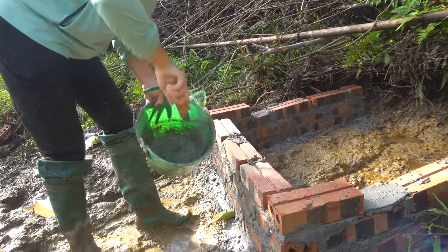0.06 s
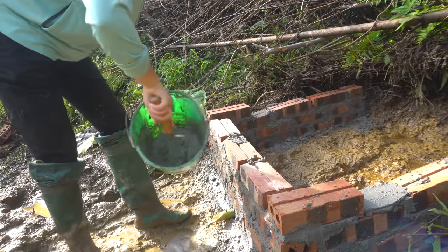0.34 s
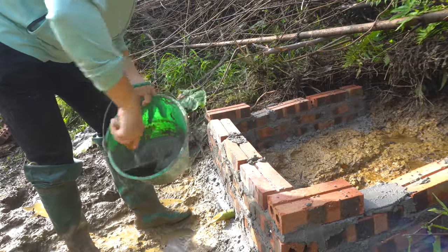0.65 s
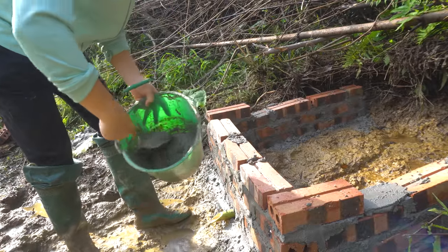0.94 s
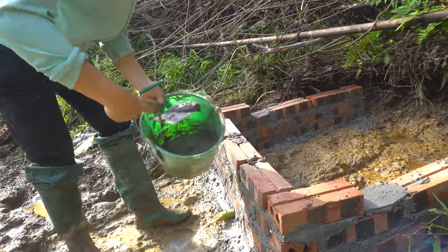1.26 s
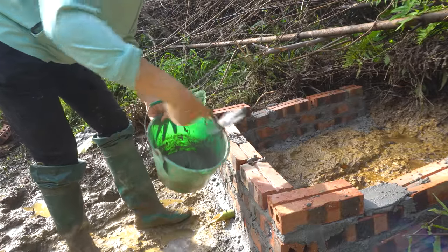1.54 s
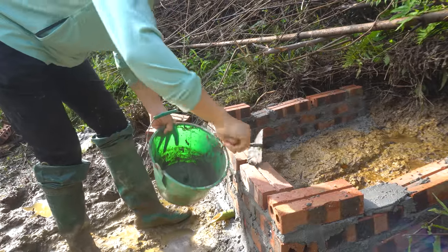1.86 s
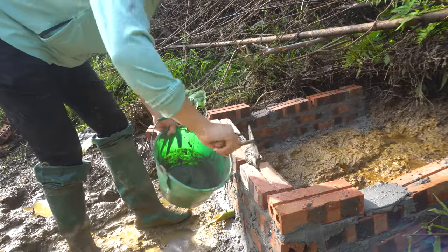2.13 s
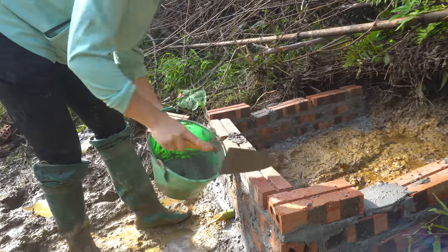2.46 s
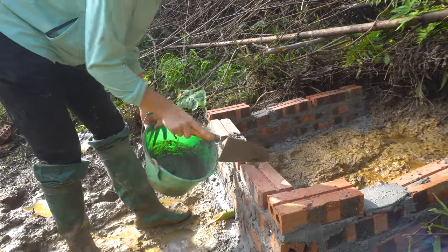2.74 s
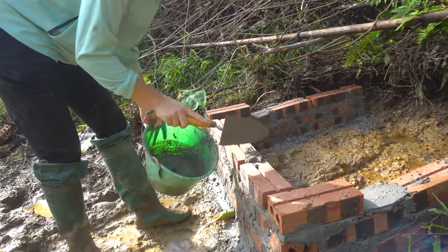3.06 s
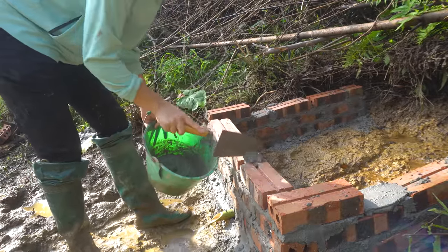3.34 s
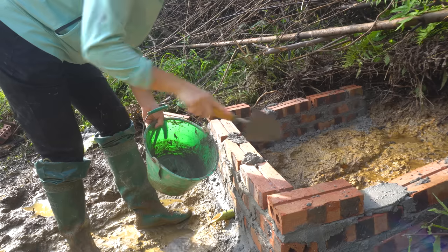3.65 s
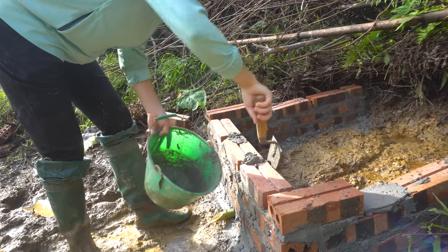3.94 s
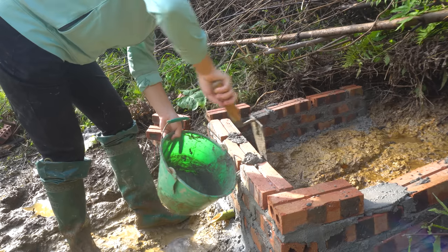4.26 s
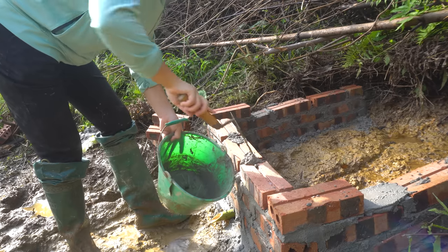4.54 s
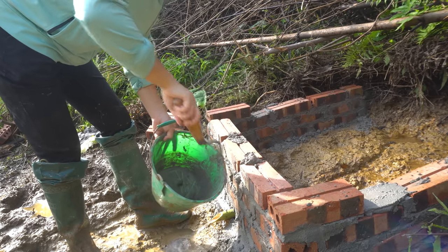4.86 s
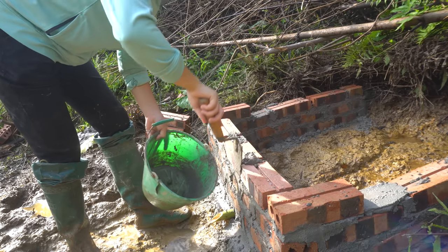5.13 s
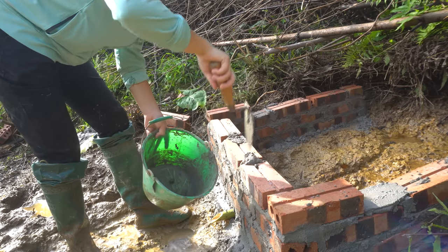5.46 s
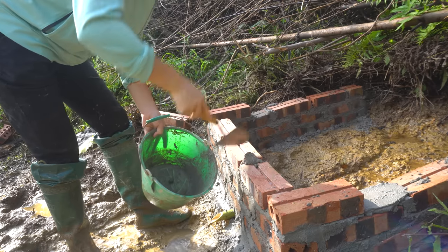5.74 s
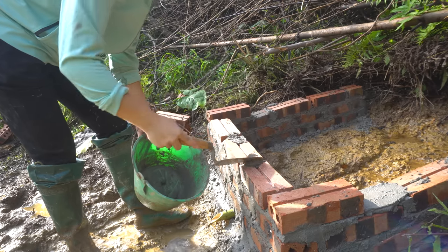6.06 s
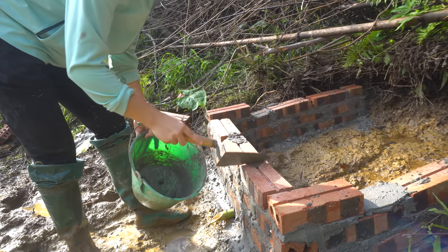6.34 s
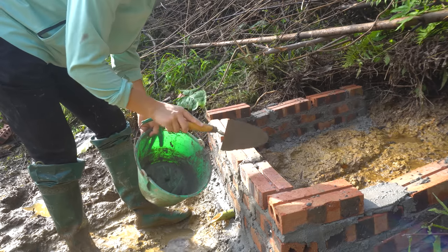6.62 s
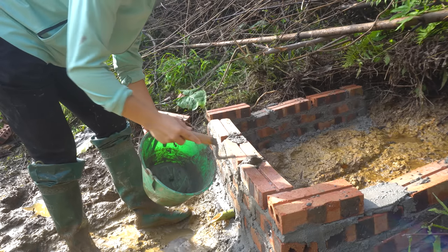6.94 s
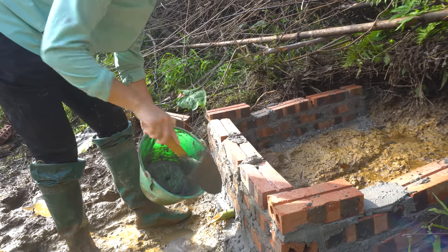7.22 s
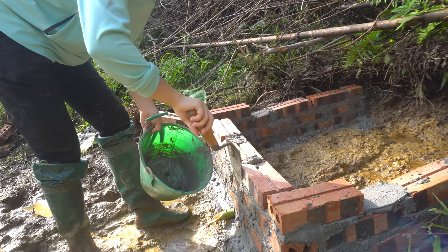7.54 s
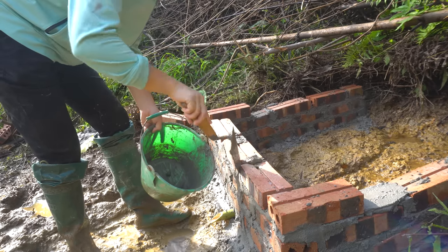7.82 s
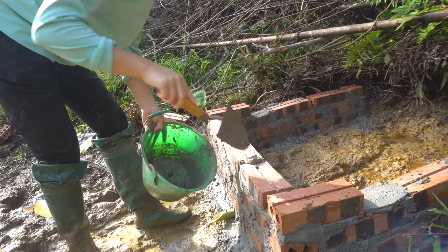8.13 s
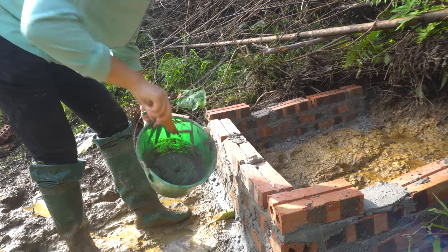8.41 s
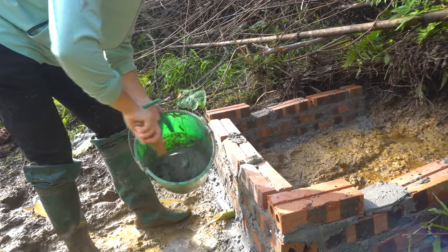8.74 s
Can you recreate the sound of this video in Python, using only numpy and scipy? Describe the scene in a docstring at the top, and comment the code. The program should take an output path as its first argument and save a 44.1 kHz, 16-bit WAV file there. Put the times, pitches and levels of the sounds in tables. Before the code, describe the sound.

A steel trowel scoops wet mortar from a plastic bucket and scrapes bricks, over trickling water and trilling insects.

```python
"""Bricklaying outdoors

A steel trowel scoops wet mortar from a plastic bucket, then taps and scrapes it along a brick wall:
the blade sticks and slips, crushes sand and rings when struck. Close by, water trickles as ringing
bubbles and crickets shrill. Two insects trill in swelling phrases, one near, one fainter and higher.
Behind them lie a far insect chorus, a low rumble and the hum of a distant engine."""
import sys
import numpy as np
from scipy import signal
from scipy.fft import rfft, irfft
from scipy.io import wavfile

SR = 44100
rng = np.random.default_rng(int(sys.argv[2]) if len(sys.argv) > 2 else 0)


def digitize_waveform(pressure):
    """Quantize a signal to 16-bit integers and store it at the path in sys.argv[1].

    Rows of a 2-D input are taken as channels; values are limited to [-1, 1].
    """
    field = np.atleast_2d(pressure).T
    bounded = np.clip(field, -1, 1)
    quanta = np.round(bounded * 32767).astype(np.int16)
    wavfile.write(sys.argv[1], SR, quanta)


N = 387198
TIME, FREQS = np.arange(N) / SR, np.fft.rfftfreq(N, 1 / SR)
BAND_LIMIT_HZ = 15850


def amp(db):
    """Decibels to gain."""
    return 10 ** (np.asarray(db) / 20)


def unit(x):
    """Scale to rms 1."""
    return x / np.sqrt(np.mean(x ** 2) + 1e-20)


def lookup(points, hz):
    """Interpolate a table over log frequency."""
    f, value = np.transpose(points)
    return np.interp(np.log(hz + 1), np.log(f + 1), value)


def add(mix, start_s, sound):
    """Mix a sound in at start_s."""
    part = mix[:, max(round(start_s * SR), 0):][:, :sound.shape[-1]]
    part += sound[..., :part.shape[1]]


def wander(hz):
    """Random drift of rms 1, bandwidth about hz."""
    knots = rng.standard_normal(N // 4)
    return unit(np.interp(TIME * 2 * hz, np.arange(len(knots)), knots))


def noise_pair(coherence):
    """Stereo white noise with the given left-right coherence."""
    common, separate = rfft(rng.standard_normal((2, N)))
    same = np.clip(lookup(coherence, FREQS), 0, 1)
    return irfft(np.array([common, same * common + np.sqrt(1 - same ** 2) * separate]), N)


def ring(hz, t60_s, rise=0., attack_s=0.0013):
    """Damped sine; pitch climbs by the fraction rise per t60."""
    t = np.arange(0, t60_s * 2, 1 / SR)
    envelope = amp(-60 * t / t60_s) * (1 - np.exp(-t / attack_s))
    return envelope * np.sin(2 * np.pi * hz * t * (1 + rise * t / t60_s / 2))


# background rumble and hiss, with narrow dips either side of 3.2 kHz: f/Hz, level/dB
BACKGROUND_SPECTRUM = [(20, -17), (45, -4), (75, 5.5), (125, 2.5), (200, -2.5), (450, -8.5), (750, -3.5),
                       (1100, -8.5), (2400, -8.5), (2830, -11), (3200, -0.5), (3750, -11), (4300, -9),
                       (6500, -12.5), (10000, -9), (13000, -17.5), (16000, -13.5)]
# far sound, left to right: f/Hz, coherence/0-1
FAR_COHERENCE = [(100, 0.94), (300, 0.2), (1000, 0), (4000, 0.37), (15000, 0)]
def ambience(level_db=-52, flutter_db=2.5, crossover_hz=450):
    """Steady rumble under the fluttering wash of the water."""
    spectrum = rfft(noise_pair(FAR_COHERENCE)) * amp(lookup(BACKGROUND_SPECTRUM, FREQS))
    low_share = 1 / (1 + (FREQS / crossover_hz) ** 4)
    rumble = irfft(spectrum * low_share, N)
    wash = irfft(spectrum * (1 - low_share), N) * amp(flutter_db * wander(30))
    return amp(level_db) * unit(rumble + wash)


# engine firing rate: t/s, f/Hz
FIRING_RATE = [(1.1, 89.4), (4.53, 89.7), (4.82, 96.8), (5.15, 96.6), (5.51, 91), (6.07, 95), (6.26, 87.3),
               (8.18, 90.0), (8.6, 97.3)]
def engine(idle_hz=88.6, idle_db=-59, load_db_per_hz=0.42, waver_db=1.9, drift_hz=0.5):
    """Far firing note, louder with speed, wavering on its way through the air."""
    hz = np.interp(TIME, *np.transpose(FIRING_RATE)) + drift_hz * wander(2.3)
    level = amp(idle_db + load_db_per_hz * (hz - idle_hz) + waver_db * wander(4.5))
    return level * unit(np.sin(2 * np.pi * np.cumsum(hz) / SR))


def chorus(hz, width_hz, level_db, flutter_db):
    """Many far insects merge into a fluttering band of hiss."""
    band = irfft(rfft(noise_pair(FAR_COHERENCE)) * np.exp(-2 * ((FREQS - hz) / width_hz) ** 2), N)
    return amp(level_db) * unit(band * amp(flutter_db * wander(63) + 0.16 * wander(13)))


# one cricket a row: f/Hz, pulse rate/Hz, chirp rate/Hz, level/dB
CRICKET_VOICES = [(4995, 62, 20.7, -56.5), (4910, 240, 9, -57.5), (4460, 52, 5.3, -61),
                  (4710, 110, 3.7, -68)]
def crickets(fall=0.051, waver=.012):
    """Each cricket sings quick falling pulses, grouped into chirps, from its own direction."""
    out = np.zeros((2, N))
    for hz, pulse_hz, chirp_hz, db in CRICKET_VOICES:
        clock_s = np.cumsum(1 + .04 * wander(3)) / SR
        stroke = clock_s * pulse_hz % 1
        envelope = np.sin(np.pi * stroke) * (1 + 0.8 * np.sin(2 * np.pi * chirp_hz * clock_s))
        cycles = np.cumsum(hz * (1 - fall * (stroke - .5) + waver * wander(153))) / SR
        ear_offset = rng.uniform(0, 0.4, (2, 1))
        out += amp(db) * unit(envelope * np.sin(2 * np.pi * (cycles + ear_offset)))
    return out


# two insects, one near, one fainter and higher: start/s, climax/s, end/s, gain/dB, pitch shift/Hz
TRILL_PHRASES = [(1.02, 1.66, 2.08, -1, 0), (2.42, 2.62, 2.72, -12, 220), (2.83, 3.56, 4.2, -1, 0),
                 (4.98, 5.63, 6.5, -2, 0), (6.05, 6.25, 6.37, -9, 230), (7.02, 7.58, 8.62, -2, 0),
                 (8.3, 8.53, 8.64, -7, 230)]
def trills(base_db=-48, swell_db=6.5, unsteady_db=2.5, base_hz=3106, sharpen_hz=84, rasp_hz=35,
           pulse_s=0.025, build_s=.45, settle_s=0.0987, swell_s=0.0913):
    """Wing strokes, each falling in pitch, quicken, swell and sharpen to a climax, then settle fast."""
    out = np.zeros((2, N))
    unsteady, rasp = wander(56), wander(300)
    for start, climax, end, phrase_db, shift_hz in TRILL_PHRASES:
        t = np.arange(start, end, 1 / SR)
        urgency = np.exp(-((t - climax) / np.where(t < climax, build_s, settle_s)) ** 2)
        swell = np.exp(-((t - climax) / swell_s) ** 2)
        rate_hz = 14 + 13.5 * urgency
        since_stroke_s = np.cumsum(rate_hz) / SR % 1 / rate_hz
        stroke = np.minimum(since_stroke_s / pulse_s, 1)
        fall_hz = 168.5 + 190 * swell
        hz = base_hz + shift_hz + sharpen_hz * swell - fall_hz * (stroke - .5)
        cycles = np.cumsum(hz + rasp_hz * np.interp(t, TIME, rasp)) / SR
        level = amp(base_db + phrase_db + swell_db * swell + unsteady_db * np.interp(t, TIME, unsteady))
        add(out, start, level * np.sin(np.pi * stroke) * np.sin(2 * np.pi * cycles))
    return out


def scatter(count, top_db, spread_db, low_hz, high_hz):
    """Steady flow of bubbles, jittered in time, mostly faint. Rows: t/s, level/dB, f/Hz."""
    jitter, faintness, pitch = rng.random((count, 3)).T
    at_s = (np.arange(count) + 2 * jitter) / (count + 1) * N / SR
    db = top_db - spread_db * np.sqrt(faintness)
    return np.transpose([at_s, db, low_hz * (high_hz / low_hz) ** pitch])


def bubbles(rows, gain_db, t60_s, rise, attack_s, splash_db, splash_s, splash_ratio, spread_rad):
    """Each bubble is born with a tiny splash, then rings, rising in pitch as it nears the surface."""
    out = np.zeros((2, N))
    for at_s, db, hz in rows:
        life, glide, side = rng.uniform(-0.92, 1, 3)
        note = ring(hz, t60_s * 2.25 ** life, rise * (1 + glide), attack_s)
        t = TIME[:len(note)]
        spray = np.interp(t * hz, np.arange(200), rng.standard_normal(200))
        splash = spray * np.sin(2 * np.pi * min(splash_ratio * hz, 12000) * t) * np.exp(-t / splash_s)
        analytic = signal.hilbert(note + amp(splash_db) * splash)
        direction = np.exp(1j * spread_rad * (side - .4) * np.array([[.5], [-.5]]))  # left-right phase
        add(out, at_s, amp(db + gain_db) * np.real(analytic * direction))
    return out


# clear large bubbles: t/s, level/dB, f/Hz
LARGE_BUBBLES = [(1.196, -35, 740), (1.254, -38.5, 670), (1.5, -40, 746), (1.828, -38.5, 700),
                 (2.248, -38, 746), (2.605, -36, 686), (2.842, -35, 719), (3.058, -38, 745),
                 (3.602, -35, 732), (3.793, -36.5, 703), (4.818, -35, 710), (4.934, -38.5, 727),
                 (5.464, -37.5, 718), (6.082, -44, 740), (6.276, -34, 733), (6.524, -39.5, 729),
                 (6.727, -34.5, 755), (7.295, -43, 780), (8.336, -35, 763)]
def gurgles(gap_s=0.023):
    """Large bubbles; each clear one pulls a chain of three fainter ones after it."""
    chains = [(at_s + gap_s * (k + .5 + late), db - 3 - 6 * faintness,
               hz * (1.005 + 0.051 * (2 * pitch - 1)))
              for at_s, db, hz in LARGE_BUBBLES
              for k, (late, faintness, pitch) in enumerate(rng.random((3, 3)))]
    flow = scatter(count=320, top_db=-39, spread_db=12, low_hz=687.4, high_hz=827)
    return bubbles(np.vstack([LARGE_BUBBLES, chains, flow]), gain_db=7.5, t60_s=0.039, rise=0.042,
                   attack_s=0.0024, splash_db=-11.5, splash_s=0.0018, splash_ratio=2.116, spread_rad=1)


def breakups(count=26, size=5, length_s=0.06, top_db=-40.5, spread_db=6, low_hz=1400, high_hz=2450):
    """Air pockets break into ever smaller bubbles. Rows: t/s, level/dB, f/Hz."""
    progress = rng.random((count, size))
    start_s = (np.arange(count) + rng.random(count))[:, None] / count * N / SR
    at_s = start_s + length_s * progress
    db = top_db - spread_db * rng.random(progress.size)
    return np.transpose([at_s.ravel(), db, low_hz * (high_hz / low_hz) ** progress.ravel()])


# clear small bubbles: t/s, level/dB, f/Hz
SMALL_BUBBLES = [(1.5349, -26.5, 1840), (2.1022, -31, 2480), (2.8918, -35.5, 1980), (3.103, -33.5, 1700),
                 (3.8298, -34.5, 1800), (4.4754, -36, 1490), (5.272, -30, 1580), (5.846, -34, 2180),
                 (7.3016, -34, 2070), (8.4168, -34.5, 1470)]
def plinks():
    """Small bubbles ring high and short, singly and in rising runs."""
    runs = breakups()
    flow = scatter(count=700, top_db=-37, spread_db=17.5, low_hz=1180, high_hz=2454)
    return bubbles(np.vstack([SMALL_BUBBLES, runs, flow]), gain_db=4, t60_s=0.017, rise=0.16,
                   attack_s=0.00046, splash_db=-9.5, splash_s=0.0049, splash_ratio=1.05, spread_rad=0.3)


# clear drops: t/s, level/dB, f/Hz
DROPS = [(1.8225, -27, 3310), (1.8387, -34, 9700), (2.1651, -29.5, 5660), (2.339, -30.5, 10400),
         (2.8805, -24.5, 7250), (3.1453, -28, 5770), (3.993, -26, 6360), (4.6794, -24.5, 10300),
         (4.9554, -29, 8200), (5.9787, -27, 5770), (6.2928, -27.5, 9540)]
def drips():
    """Drops hit the water, a few clear among many faint."""
    flow = scatter(count=400, top_db=-27.5, spread_db=21, low_hz=4910, high_hz=13550)
    return bubbles(np.vstack([DROPS, flow]), gain_db=1.5, t60_s=0.0078, rise=0.18,
                   attack_s=0.00026, splash_db=-5.5, splash_s=0.0029, splash_ratio=0.94, spread_rad=1.4)


# bucket knocks and falling mortar: t/s, level/dB, f/Hz, t60/s
SOFT_BLOWS = [(.249, -10, 1090, 0.014), (.2625, -11, 400, 0.04), (.497, -1, 1110, 0.012),
              (.9405, -10, 490, 0.022), (2.652, -35.5, 270, 0.019), (4.3705, -16.5, 325, 0.015),
              (5.898, -43.5, 212, 0.13), (6.3756, -15, 920, 0.021), (8.657, -13.5, 625, 0.028),
              (8.691, -18, 147, 0.037), (8.703, -28, 96, 0.094), (8.693, -25.5, 379, 0.11)]
def thuds():
    """Each soft blow gives one short, dull note."""
    out = np.zeros((2, N))
    for at_s, db, hz, t60_s in SOFT_BLOWS:
        add(out, at_s, amp(db) * ring(hz, t60_s))
    return out


# steel blade damped by mortar: f/Hz, gain/dB, t60/s
BLADE_MODES = [(854, -3, 0.016), (1253, -25.5, 0.12), (1681, -4, 0.037), (2464, -9, 0.015),
               (2560, -41.5, 0.036), (2670, -12, 0.047), (4040, -31, 0.036)]
# blade striking brick or bucket: t/s, level/dB
BLADE_TAPS = [(0.175, -17.5), (2.648, -27), (2.655, -22), (2.766, -32), (4.227, -28), (5.8981, -24),
              (6.3757, -16), (8.619, -18)]
def taps():
    """Each tap rings all modes of the blade."""
    out = np.zeros((2, N))
    for at_s, db in BLADE_TAPS:
        for hz, mode_db, t60_s in BLADE_MODES:
            add(out, at_s, rng.choice([-1, 1]) * amp(db + mode_db) * ring(hz, t60_s))
    return out


# chatter of the dragged edge: t/s, length/s, level/dB, f/Hz, width/Hz
EDGE_CHATTER = [(0.734, 0.051, -31, 2300, 900), (.905, 0.038, -30, 4230, 700),
                (2.648, 0.022, -38, 1224, 69.7), (4.205, .095, -43.5, 840, 250),
                (5.394, 0.076, -39, 2800, 900), (6.375, 0.0053, -21, 2770, 1990),
                (6.376, 0.027, -40, 1540, 120), (6.375, 0.11, -46, 3590, 200), (8.05, 0.05, -47, 3500, 900),
                (8.762, 0.029, -26, 1920, 300)]
def squeals():
    """Fast stick-slip holds one narrow band of the blade in vibration."""
    out = np.zeros((2, N))
    for at_s, length_s, db, hz, width_hz in EDGE_CHATTER:
        samples = int(np.ceil(length_s * SR))
        pole = np.exp((-np.pi * width_hz + 2j * np.pi * hz) / SR)
        band = signal.lfilter([1], np.poly([pole, pole]), rng.standard_normal(SR)).real[-samples:]
        add(out, at_s, amp(db) * unit(band) * signal.windows.tukey(samples, .5))
    return out


# rubbing noise, left to right: f/Hz, coherence/0-1
NEAR_COHERENCE = [(100, 1), (700, 0.92), (1500, 0.83), (3100, 0.85), (7000, 0.38), (15000, 0.52)]
def sand(slip_db, slip_hz, grain_db, grain_hz, stutter_db, stutter_hz):
    """The hand stutters, the blade sticks and slips; each slip crushes a clump of grains."""
    force_db = stutter_db * np.tanh(wander(stutter_hz)) + slip_db * np.tanh(wander(slip_hz))
    noise = noise_pair(NEAR_COHERENCE)
    return unit(noise * amp(force_db + grain_db * np.minimum(wander(grain_hz), 2.5)))


def colour(x, spectrum_db, tilt_db_oct, ripple_db=0):
    """Causal unit-energy filter: spectrum, treble tilt, random ripple for the point of contact."""
    hz = np.fft.rfftfreq(2048, 1 / SR)
    knots = np.linspace(np.log(300), np.log(BAND_LIMIT_HZ), 48)
    ripple = np.interp(np.log(hz + 1), knots, rng.standard_normal(48))
    log_gain = np.log(amp(spectrum_db(hz) + tilt_db_oct * np.log2(np.maximum(hz, 700))
                          + ripple_db * ripple))
    mirrored = np.concatenate([log_gain, log_gain[-2:0:-1]])
    impulse = np.fft.ifft(np.exp(np.conj(signal.hilbert(mirrored)))).real  # minimum phase
    return signal.fftconvolve(x, impulse[None] / np.linalg.norm(impulse), axes=1)


def strokes(rows, grains, spectrum_db, attack_s, sag_db_per_s, release_s, ripple_db):
    """A short stroke bites, loses force at a steady rate and lifts off."""
    out = np.zeros((2, N))
    for at_s, length_s, db, tilt_db_oct in rows:
        part = grains[:, round(at_s * SR):round((at_s + length_s + .03) * SR)]
        t = TIME[:part.shape[1]]
        bite = 1 - np.exp(-t / attack_s)
        lift = np.exp(-np.maximum(t - length_s, 0) / release_s)
        push = amp(db - sag_db_per_s * t) * bite * lift
        rub = unit(part * push) * np.sqrt(np.mean(push ** 2))
        add(out, at_s, colour(rub, spectrum_db, tilt_db_oct, ripple_db))
    return out


# sand between steel and brick: f/Hz, level/dB
GRIT_SPECTRUM = [(60, -21.5), (250, -6.5), (600, -4), (1500, -4), (3000, 1), (6000, 1.5), (10000, 3),
                 (15500, -1)]
def grit_db(hz, width_hz=100, lift_db=5):
    """Grit spectrum, lifted at the modes of the blade."""
    peaks = sum(1 / (1 + (2 * (hz - f) / width_hz) ** 2) for f, _, _ in BLADE_MODES)
    return lookup(GRIT_SPECTRUM, hz) + lift_db * peaks


# blade on brick: t/s, length/s, level/dB, tilt/(dB/oct)
BRICK_SKIDS = [(2.648, .03, -35.5, 3), (4.2, 0.018, -31.5, -1), (4.224, 0.087, -29, 0),
               (5.896, 0.0036, -21, 1), (5.9015, 0.0046, -12, 9), (5.905, 0.058, -29.5, 0.5),
               (6.376, 0.19, -29.5, -1), (7.513, 0.029, -31, -0.2)]
def skids(grains):
    """The blade is set down hard and skids to rest."""
    return strokes(BRICK_SKIDS, grains, grit_db,
                   attack_s=0.0018, sag_db_per_s=133, release_s=0.002, ripple_db=5)


# blade on the mortar joint: t/s, length/s, level/dB, tilt/(dB/oct)
JOINT_WIPES = [(2.715, 0.069, -41.5, -.5), (3.37, 0.13, -50.5, 1), (4.11, 0.089, -44.5, 2),
               (4.354, .085, -38.5, -2.5), (5.196, 0.055, -33, 1), (5.245, 0.17, -36.5, -2.6),
               (5.403, .06, -34, -1.5), (5.472, 0.04, -39, 0.5), (6.008, .17, -45.5, 0.5),
               (6.91, 0.12, -49.5, 1), (7.566, 0.089, -39, -1.5), (7.823, 0.068, -40.5, -2.3),
               (7.904, .14, -40.5, -3), (8.052, .042, -41, -3)]
def wipes(grains):
    """The blade eases in and rubs along the joint with nearly even force."""
    return strokes(JOINT_WIPES, grains, grit_db,
                   attack_s=0.0082, sag_db_per_s=16, release_s=0.0042, ripple_db=2.5)


# coarsest sand grains: t/s, level/dB, tilt/(dB/oct)
COARSE_CRACKS = [(.1734, -11.5, -4.5), (.262, -4.5, -1.5), (.308, -19, -1), (.3276, -9, -3),
                 (.552, -13.5, -2.5), (.918, -14, -6), (2.649, -25, 0), (4.25, -13, 3), (4.4, -21, 3),
                 (5.241, -14, .5), (5.8962, -18, 1.5), (5.952, -14, 3), (6.3759, -17, -2.5),
                 (6.399, -10.5, 7), (6.4518, -18, -1), (7.5122, -30, -1), (8.705, -9.5, -4)]
def cracks(gain_db=-5, decay_s=0.00094):
    """Coarse grains burst under the blade; each wipe also breaks two smaller ones at random."""
    out = np.zeros((2, N))
    noise = noise_pair(NEAR_COHERENCE)
    t = np.arange(0, .015, 1 / SR)
    fine = [(start_s + progress * length_s, db + 15 - 8 * faintness, -1)
            for start_s, length_s, db, _ in JOINT_WIPES for progress, faintness in rng.random((2, 2))]
    for at_s, db, tilt_db_oct in list(COARSE_CRACKS) + fine:
        burst = noise[:, round(at_s * SR):][:, :len(t)] * np.exp(-t / decay_s)
        add(out, at_s, amp(db + gain_db) * colour(burst, grit_db, tilt_db_oct))
    return out


# wet mortar: f/Hz, level/dB
MORTAR_SPECTRUM = [(40, -49), (130, -14.5), (280, -10.5), (500, -4.5), (780, -4.5), (1400, -3.5),
                   (2600, -2.5), (4000, -7), (7000, -8), (15500, -8)]
# bucket resonances: f/Hz, width/Hz, lift/dB
BUCKET_MODES = [(352, 29, 8), (470, 77, 3.5), (635, 37, 1.5), (1078, 280, 5.5), (1480, 55, 9.5),
                (1765, 100, 4), (2087, 180, 1.5)]
def bucket_db(hz):
    """Wet mortar heard through the resonances of the bucket."""
    peaks_db = sum(db / (1 + (2 * (hz - f) / width_hz) ** 2) for f, width_hz, db in BUCKET_MODES)
    return lookup(MORTAR_SPECTRUM, hz) + peaks_db


# blade into mortar: t/s, length/s, level/dB, tilt/(dB/oct)
MORTAR_STABS = [(0.17, 0.034, -21, -0.5), (0.204, 0.064, -24, -2), (0.299, 0.024, -35, 0),
                (0.411, 0.034, -36.5, -0.5), (0.7364, 0.023, -24.5, -2.5), (8.617, 0.0097, -19.5, 0.3),
                (8.631, .075, -28, -1.5), (8.728, 0.067, -29.5, -2)]
def stabs(grains):
    """The blade is shoved into the wet mortar in the bucket."""
    return strokes(MORTAR_STABS, grains, bucket_db,
                   attack_s=0.0022, sag_db_per_s=25, release_s=0.0025, ripple_db=2.5)


# long scoop, dull while the blade is buried: t/s, push/dB, treble/dB
SCOOP_PATH = [(0.29, -36, -4), (0.306, -24, -9), (0.366, -31, -12.5), (0.48, -26.5, -8),
              (0.494, -24.5, -19), (0.542, -30.5, -7), (0.788, -22.5, -8.5), (0.85, -28, -7.5),
              (0.938, -19, -9.5), (0.958, -21, -4), (1.168, -37, 0.5), (1.2, -54, -3)]
def scoop(grains, gain_db=-2, base_tilt_db_oct=0.84, tilt_per_treble=0.44, ripple_db=3):
    """One long drag through the mortar; its colour drifts as the contact moves round the bucket."""
    out = np.zeros((2, N))
    drag = grains * amp(scoop_push_db(TIME) + gain_db)
    path_s, _, treble_db = np.transpose(SCOOP_PATH)
    contacts_s, step_s = np.linspace(path_s[0], path_s[-1], 20, retstep=True)
    window = np.hanning(round(2 * step_s * SR))
    for at_s in contacts_s:
        part = drag[:, round((at_s - step_s) * SR):][:, :len(window)] * window
        tilt_db_oct = base_tilt_db_oct + tilt_per_treble * np.interp(at_s, path_s, treble_db)
        add(out, at_s - step_s, colour(part, bucket_db, tilt_db_oct, ripple_db))
    return out


def scoop_push_db(at_s):
    """How hard the scoop pushes at a given time."""
    path_s, push_db, _ = np.transpose(SCOOP_PATH)
    return np.interp(at_s, path_s, push_db, left=-120, right=-120)


def squelch(t60_s=0.0033):
    """Air pockets pop in the wet mortar, louder as the blade pushes harder."""
    out = np.zeros((2, N))
    for at_s, db, hz in scatter(count=1500, top_db=7, spread_db=13, low_hz=420, high_hz=2300):
        stabs_db = [level for start, length, level, _ in MORTAR_STABS if start < at_s < start + length]
        push_db = max([scoop_push_db(at_s)] + stabs_db)
        add(out, at_s, amp(db + push_db) * ring(hz, t60_s))
    return out


def echoes(x, level_db, t60_s):
    """Short, dull scatter from the ground, the wall and the bank."""
    t = np.arange(0, .25, 1 / SR)
    sparse = rng.standard_normal((2, len(t))) * (rng.random((2, len(t))) < .05)
    bandpass = signal.butter(1, [600, 5000], "bandpass", fs=SR, output="sos")
    impulse = signal.sosfilt(bandpass, sparse * amp(-60 * t / t60_s) * (t > .003))
    return amp(level_db) * signal.oaconvolve(x, impulse / np.linalg.norm(impulse[0]), axes=1)[:, :N]


def scene():
    """The trowel in front, water and insects around it, hiss and hum far off."""
    wet = sand(slip_db=5, slip_hz=110.7, grain_db=2, grain_hz=904.5, stutter_db=-1.2, stutter_hz=35.94)
    gritty = sand(slip_db=4.5, slip_hz=118, grain_db=1.5, grain_hz=1224, stutter_db=1.2, stutter_hz=36)
    trowel = scoop(wet) + stabs(wet) + skids(gritty) + wipes(gritty)
    trowel += cracks() + taps() + thuds() + squelch() + squeals()
    around = gurgles() + plinks() + drips() + trills() + crickets()
    far = chorus(hz=4714, width_hz=600, level_db=-57, flutter_db=4)
    far += chorus(hz=8710, width_hz=950, level_db=-55, flutter_db=0.5)
    trowel += echoes(trowel, level_db=-15, t60_s=0.11)
    around += echoes(around, level_db=-16, t60_s=0.17)
    return ambience() + engine() + far + around + trowel


# microphone pair: f/Hz, left minus right/dB
MIC_BALANCE = [(110, 0.5), (380, 0.5), (700, 2.5), (1200, 3.5), (2400, 1), (4400, 4), (8100, 6),
               (15000, 8.5)]
def record(dry):
    """The left microphone gets more of the treble; a low-pass limits the band."""
    right = 2 / (1 + amp(lookup(MIC_BALANCE, FREQS)))
    heard = irfft(rfft(dry) * np.array([2 - right, right]), N)
    lowpass = signal.firwin(511, BAND_LIMIT_HZ, window=("kaiser", 9), fs=SR)
    return signal.oaconvolve(heard, lowpass[None], "same")


dry = scene()
out = record(dry)
digitize_waveform(out)
```